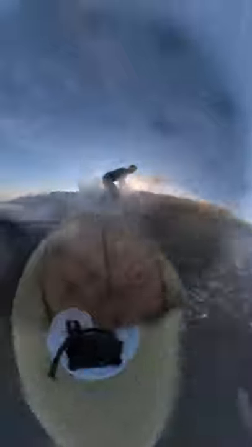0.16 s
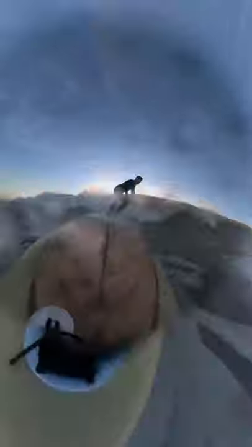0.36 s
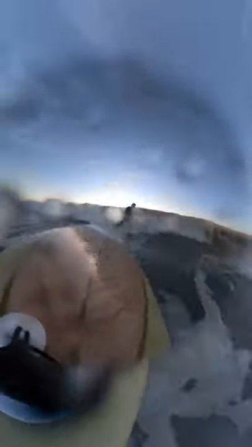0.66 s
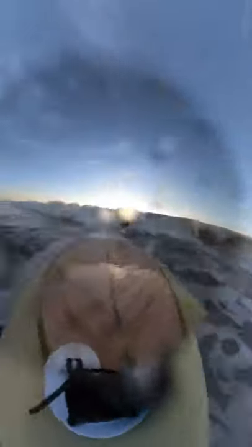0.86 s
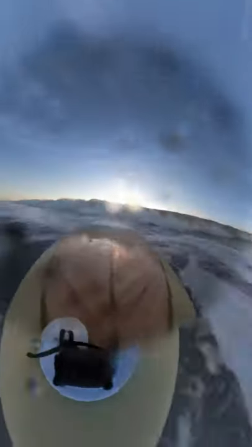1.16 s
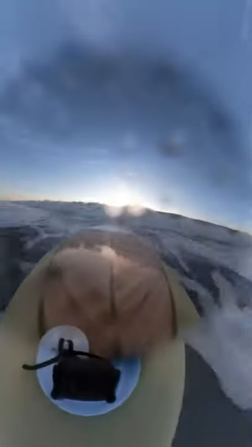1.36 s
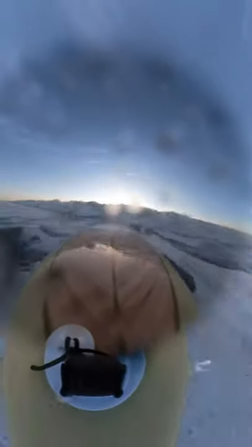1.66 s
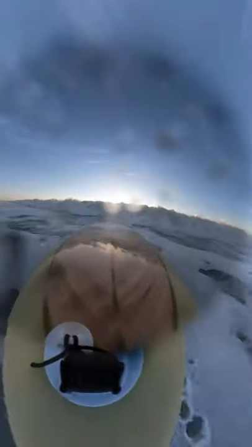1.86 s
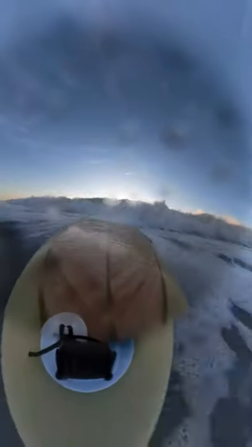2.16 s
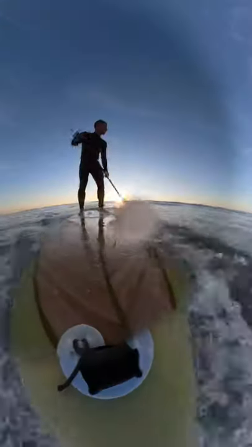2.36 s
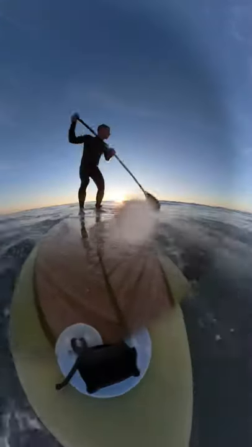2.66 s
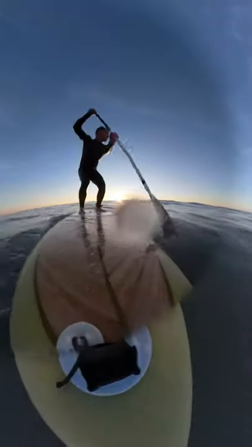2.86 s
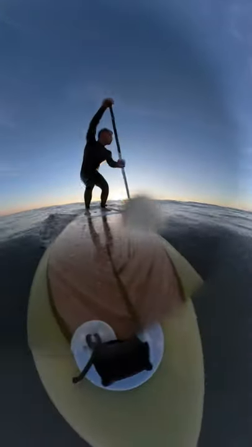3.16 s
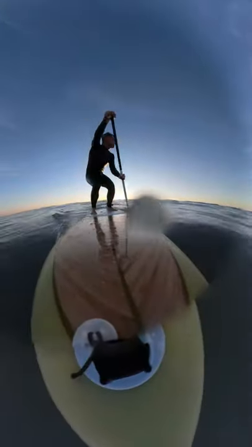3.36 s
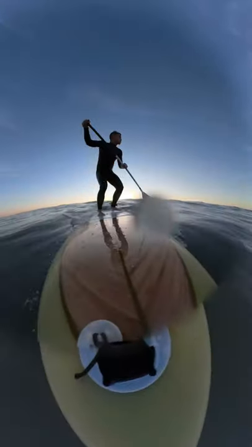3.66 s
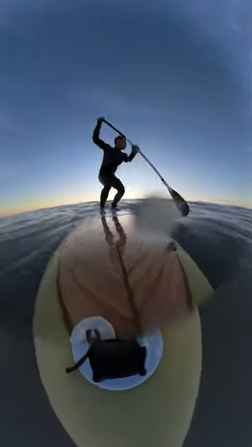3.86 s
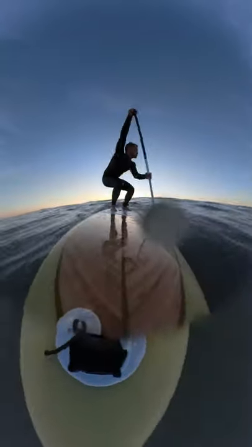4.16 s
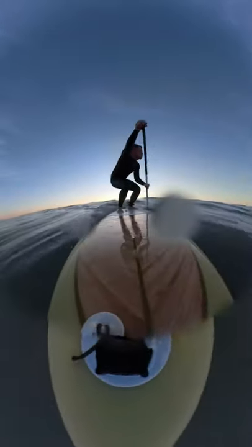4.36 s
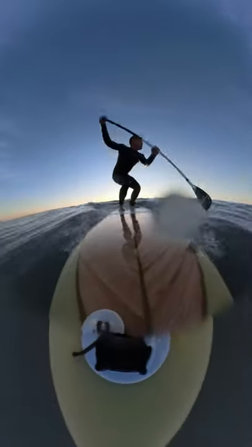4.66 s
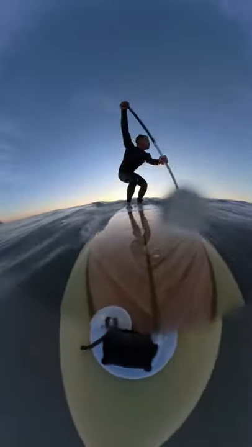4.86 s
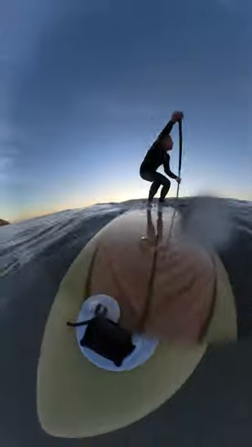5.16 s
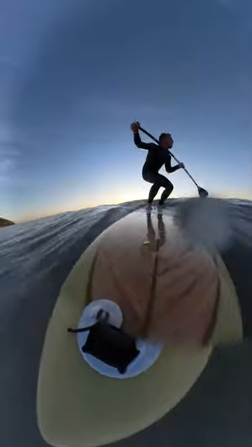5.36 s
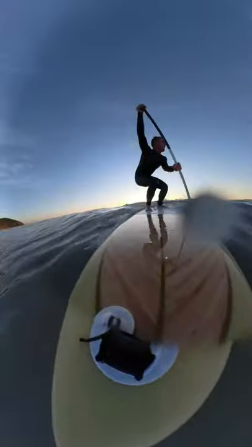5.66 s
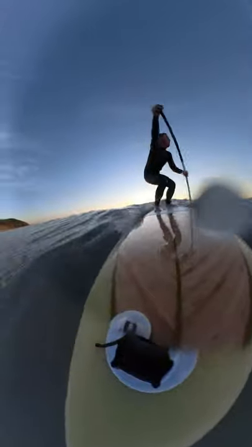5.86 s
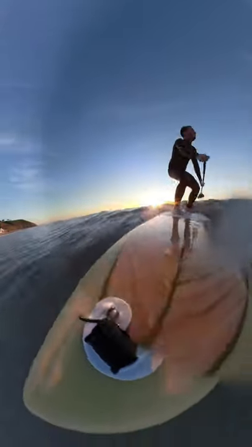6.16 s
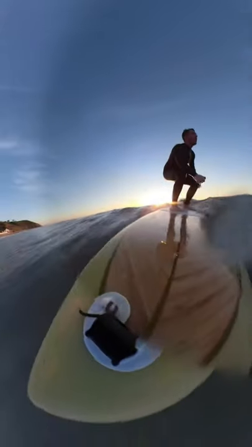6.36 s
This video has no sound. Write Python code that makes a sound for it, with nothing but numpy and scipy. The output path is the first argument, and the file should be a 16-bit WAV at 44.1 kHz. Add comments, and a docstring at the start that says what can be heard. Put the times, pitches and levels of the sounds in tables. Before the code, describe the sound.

From the start, low wind buffets a microphone on the nose of a paddle board while muffled whitewater rushes and churns. Hard gusts, soft spurts of spray, slaps and hollow thumps come unevenly, strongest around 0.9 to 1.2 seconds. At about 2.2 seconds everything cuts out for an instant, then returns with a sharp knock on the hull, a splash and a patter of fine drops that thins out by 3 seconds. The wind is now much weaker. Water washes and bubbles along the board in repeated surges, with frequent small slaps and single drops ticking close by. The hull thumps at about 3.7 and 4.4 seconds and now and then gives a brief low hum. A sharp drop strikes near 5.8 seconds among more knocks. The wind swells again, with a deep thump and splash around 6.1 seconds, and rumbles until the end at 6.5.

```python
"""Water rushing around a paddle board in the surf, heard from a microphone sealed in a housing on its nose.
The rush is the resonance of countless bubbles, surging as waves and paddle strokes shove the board.
Chop slaps and thumps the hollow hull, spray and drops strike the housing, and wind eddies buffet it.
First the board runs through whitewater, its spray softened by a film of water on the microphone;
after an instant of silence it glides along a wave with the microphone clear."""
import sys
import numpy as np
from scipy import signal
from scipy.fft import rfft, irfft, next_fast_len
from scipy.io import wavfile
from scipy.ndimage import uniform_filter1d, map_coordinates

SR = 44100
rng = np.random.default_rng(int(sys.argv[2]) if len(sys.argv) > 2 else 0)


def file_out(sig):
    """Save sig as 16-bit WAV at sys.argv[1]."""
    # one column per channel
    cols = np.atleast_2d(sig).T
    # limit, then scale
    lim = np.clip(cols, -1, 1)
    pcm = np.round(lim * 32767).astype(np.int16)
    wavfile.write(sys.argv[1], SR, pcm)


N = 286650
TIME = np.arange(N) / SR
WHITEWATER_END_S, GLIDE_START_S = 2.179, 2.225
REFERENCE_FLOW_DB = -39  # mist and stray droplets scale with the flow relative to this


def amp(db):
    """Decibels to amplitude."""
    return 10 ** (np.asarray(db) / 20)


def unit(x):
    """Normalisation to rms 1."""
    return x / np.sqrt(np.mean(x ** 2) + 1e-20)


def curves(rows):
    """Linear interpolation of each column after the time, one value per sample."""
    times, *columns = np.transpose(rows)
    return [np.interp(TIME, times, column) for column in columns]


def wobble(rate):
    """Smooth random modulation: a spline through `rate` knots a second."""
    knots = rng.standard_normal(int(N * rate / SR) + 4)
    return map_coordinates(knots, [TIME * rate])


def taper(length_s, edge):
    """A tapered cosine envelope that spends the share `edge` of its length rising and falling."""
    return signal.windows.tukey(int(length_s * SR), edge)


def filtered(x, response):
    """Linear filtering: the spectrum of x times a frequency response."""
    size = next_fast_len(len(x) + 8192)
    return irfft(rfft(x, size) * response(np.fft.rfftfreq(size, 1 / SR)), size)[:len(x)]


def coloured(x, spectrum):
    """Spectral shaping by (Hz, dB) points, at rms 1."""
    points_hz, db = np.transpose(spectrum)
    return unit(filtered(x, lambda hz: amp(np.interp(np.log(hz + 1), np.log(points_hz), db))))


def resonance(x, centre_hz, q):
    """Two damped resonators in cascade, at rms 1."""
    return unit(filtered(x, lambda hz: (1j * hz / (centre_hz**2 - hz**2 + 1j * hz * centre_hz / q))**2))


def add(track, start_s, sound):
    """Superposition of a sound on the track."""
    part = track[max(round(start_s * SR), 0):][:len(sound)]
    part += sound[:len(part)]


def wet_or_clear(wet, clear):
    """The first value while water films the microphone, the second on the glide."""
    return np.where(TIME < WHITEWATER_END_S, wet, clear)


def eddies(spectrum):
    """Turbulent pressure: eddies of fairly even strength, as noise divided by its smoothed envelope."""
    pressure = signal.hilbert(coloured(rng.standard_normal(N), spectrum))
    return unit(pressure.real / uniform_filter1d(np.abs(pressure), size=SR // 16))


# Strength of the wind. Each row: time in seconds, level in dB.
WIND_LEVELS = [(0, -25.5), (.2, -27.5), (.3, -24.5), (1.12, -20.5), (1.4, -22), (1.5, -34.5), (1.6, -29.5),
               (1.77, -27), (2.23, -30), (2.5, -35), (3.12, -45), (3.7, -34), (4.85, -36.5), (5.6, -35.5),
               (5.9, -25), (6.11, -34), (6.17, -27), (6.5, -21)]
# Spectra of fast and slow air. Each row: frequency in Hz, relative level in dB.
FAST_AIR_SPECTRUM = [(10, -21), (22, 0.5), (36, -5), (54, 5), (80, -2.5), (125, -3.5), (170, -19),
                     (300, -23.5), (800, -90), (3000, -120)]
SLOW_AIR_SPECTRUM = [(10, -20), (22, 0), (36, -1), (54, -3), (80, -5.5), (120, -12.5), (170, -34.5),
                     (300, -45), (2000, -120)]

def wind():
    """Turbulence: faster air sheds quicker eddies, so the buffeting reaches higher in the whitewater."""
    mean_db, = curves(WIND_LEVELS)
    buffet = wet_or_clear(eddies(FAST_AIR_SPECTRUM), eddies(SLOW_AIR_SPECTRUM))
    puffs_db = 1.35 * wobble(rate=12)
    return amp(mean_db + puffs_db) * buffet


# Head-on gusts. Each row: start in seconds, peak level in dB, shedding rate in Hz, length in seconds.
HEAD_GUSTS = [(0.259, -16, 47.3, 0.15), (0.387, -16, 91.4, 0.037), (0.492, -15.5, 33, .06),
              (0.582, -17, 113.3, 0.04), (0.856, -11, 43.7, 0.037), (0.976, -18, 58, 0.058),
              (1.08, -12.5, 54.3, 0.065), (1.145, -15.5, 106, 0.041), (1.231, -20.5, 91.2, 0.053),
              (1.713, -18, 46, 0.17), (2.043, -18.5, 56, 0.047), (3.692, -25.5, 60, 0.086),
              (4.565, -28, 76.7, 0.057), (5.165, -25, 58, 0.13), (5.379, -24.5, 40.3, 0.067),
              (5.551, -28, 45.6, 0.048), (6.147, -14.5, 37.2, 0.11)]

def gusts():
    """Vortex shedding: a gust leaves a short train of large, uneven vortices on the housing."""
    track = np.zeros(N)
    for start, db, hz, length in HEAD_GUSTS:
        swell = taper(length, edge=0.25)
        flutter_hz = hz * np.exp(0.2 * wobble(rate=50)[:len(swell)])
        turns = np.cumsum(flutter_hz) / SR
        add(track, start, -amp(db) * swell * np.sin(2 * np.pi * turns))
    return track


def strays(wash_db, count, typical_hz=3400, patter_s=0.02):
    """Random impacts: rows for drops() of droplets on the glide, landing harder in faster water."""
    when = rng.uniform(GLIDE_START_S, N / SR, count)
    weight, pitch = rng.standard_normal((count, 2)).T
    db = -44.5 + 10.5 * weight + wash_db[(when * SR).astype(int)] - REFERENCE_FLOW_DB
    return list(zip(when, db, typical_hz * 2 ** (0.2 * pitch), np.full(count, patter_s)))


def runoff(count, drain_s=0.55, fade_db_per_s=17, typical_hz=4200, patter_s=0.012):
    """Drainage: rows for drops() of fine droplets leaving the housing as the glide begins."""
    delay = drain_s * rng.random(count) ** 1.4
    weight, pitch = np.clip(rng.standard_normal((count, 2)), -2, 2).T
    db = -39.5 + 3.5 * weight - fade_db_per_s * delay
    return list(zip(GLIDE_START_S + delay, db, typical_hz * 2 ** (0.34 * pitch), np.full(count, patter_s)))


# Heavy drops on the housing. Each row: start in seconds, level in dB, pitch in Hz,
# time for the patter to fall 60 dB in seconds.
HEAVY_DROPS = [(.8615, -33, 5160, .012), (0.8735, -25.5, 2930, 0.02), (0.8768, -31.5, 5100, 0.016),
               (0.8882, -27, 3080, 0.016), (1.111, -38, 5400, .008), (1.119, -24, 2670, 0.016),
               (1.1269, -20.5, 3330, .024), (2.236, -29.5, 5500, .006), (2.249, -29, 3500, .014),
               (2.254, -23, 5000, 0.014), (2.269, -32, 3200, .016), (2.279, -28, 2900, .014),
               (2.291, -32, 4200, .012), (2.308, -32, 2900, .03), (2.348, -32, 3540, .025),
               (2.385, -41, 6950, 0.018), (2.415, -30.5, 4870, 0.016), (2.428, -40, 3500, .015),
               (2.476, -37, 2680, 0.03), (2.591, -37, 5000, 0.02), (2.618, -37, 3000, 0.022),
               (2.68, -34.5, 2780, .025), (2.721, -36, 5850, 0.01), (2.809, -32.5, 2600, 0.038),
               (2.976, -29, 2760, 0.019), (3.444, -32.5, 2770, .02), (3.673, -31, 2700, 0.024),
               (4.088, -29.5, 3260, 0.018), (4.594, -32.5, 2700, .014), (5.208, -25, 2540, .02),
               (5.434, -45, 5100, .015), (5.823, -34, 5600, 0.011), (5.831, -16.5, 2520, 0.018),
               (5.8341, -12, 2700, 0.003), (5.8344, -17.5, 4550, 0.0024), (6.146, -30, 5400, .015),
               (6.172, -30, 4500, 0.0065), (6.286, -32, 3370, 0.022), (6.315, -36, 4300, .02)]

def drops(droplets, rise_cycles=0.59, crisp_db=-26, lowest_hz=1960):
    """Impact sound: each heavy drop or small droplet ticks, then patters faintly as it breaks up."""
    track, t = np.zeros(N), np.arange(SR // 20) / SR
    for start, db, hz, patter_s in HEAVY_DROPS + droplets:
        age = t * hz / rise_cycles
        tick = np.sin(2 * np.pi * hz * t) * (age * np.exp(1 - age)) ** 2
        envelope = amp(-12.5 - 60 * t / patter_s) * (1 - np.exp(-age))
        patter = resonance(rng.standard_normal(len(t)), hz, q=4) * envelope
        # A drop is soft: only a small crisp share reaches far above its pitch.
        impact = filtered(0.66 * tick + patter, lambda f: 1 / (1 + (f / (1.59 * hz))**12) + amp(crisp_db))
        add(track, start, amp(db) * impact)
    # Drops are too small to radiate low frequencies.
    return filtered(track, lambda hz: 1 - 1 / (1 + (hz / lowest_hz) ** 12))


# Spray thrown over the nose. Each row: start in seconds, level in dB, length in seconds.
SPRAY_SHEETS = [(0.225, -46.5, 0.05), (0.545, -50.5, 0.018), (0.854, -44.5, 0.042), (1.102, -41.5, 0.044),
                (1.169, -48, 0.046), (1.681, -49.5, 0.03), (2.245, -44.5, 0.048), (2.962, -48.5, 0.029),
                (3.056, -50.5, 0.038), (3.117, -50, 0.077), (3.82, -54, 0.023), (4.47, -52, 0.053),
                (5.763, -58, 0.024), (6.13, -49, 0.033), (6.172, -51.5, 0.062), (6.268, -56, 0.074)]
# Spectra of a spurt at the wet microphone and of all spray at the clear one.
# Each row: frequency in Hz, relative level in dB.
WET_SPURT_SPECTRUM = [(500, -26), (1300, 4.5), (2700, 12), (4000, -10), (5500, -14), (6500, -33.5),
                      (9000, -58.5)]
CLEAR_SPRAY_SPECTRUM = [(1200, -21), (2100, 1), (2750, 3.5), (3100, -4), (3800, -6.5), (4500, -12),
                        (5200, -10), (6200, -18), (7000, -31.5), (8000, -35), (11000, -54.5)]

def spurts():
    """Incoherent summation: a sheet of spray lands all at once and its impacts merge into a hiss."""
    envelope, hiss = np.zeros(N), rng.standard_normal(N)
    for start, db, length in SPRAY_SHEETS:
        add(envelope, start, amp(db) * taper(length, edge=0.3))
    return envelope * wet_or_clear(coloured(hiss, WET_SPURT_SPECTRUM), coloured(hiss, CLEAR_SPRAY_SPECTRUM))


# Held notes of the hull. Each row: start in seconds, length in seconds, level in dB, pitch in Hz.
HULL_DRONES = [(2.86, 0.34, -47.5, 196), (3.46, 0.065, -30, 373), (4.26, 0.34, -33.5, 198),
               (5.83, 0.18, -31, 260)]

def drones():
    """Forced vibration: water drumming along the hollow hull keeps its resonance sounding unevenly."""
    track = np.zeros(N)
    for start, length, db, hz in HULL_DRONES:
        swell = taper(length, edge=0.6)
        note = resonance(rng.standard_normal(SR), hz, q=5.5)[SR // 4:][:len(swell)]
        add(track, start, amp(db) * swell * unit(note))
    return track


# Blows on the hull. Each row: start in seconds, level in dB, pitch in Hz, 60 dB decay time in seconds.
HULL_THUMPS = [(.25, -16, 304, 0.071), (0.869, -16, 257, 0.058), (1.102, -12, 322, 0.05),
               (2.06, -13.5, 135, 0.057), (2.25, -4.5, 228, 0.026), (2.281, -9.5, 234, 0.043),
               (3.688, -15, 132, 0.13), (4.369, -15, 186, 0.084), (5.665, -16.5, 221, 0.058),
               (5.848, -17, 326, 0.056), (5.915, -15, 150, 0.047), (6.139, -5, 65.5, 0.11)]

def thumps():
    """Damped free vibration: the hull answers a heavy blow of water with a low, dying note."""
    track, t = np.zeros(N), np.arange(SR // 4) / SR
    attack = 1 - np.exp(-t / 0.0044)
    for start, db, hz, t60 in HULL_THUMPS:
        add(track, start, amp(db - 60 * t / t60) * np.sin(2 * np.pi * hz * t) * attack)
    return track


# Chop striking the nose. Each row: start in seconds, level in dB, pitch of the trapped air in Hz,
# its 60 dB decay time in seconds, its relative level in dB.
CHOP_SLAPS = [(0.228, -31.5, 790, 0.067, -6), (0.396, -29.5, 780, 0.045, -3),
              (0.497, -27.5, 432, .02, -4.5), (0.55, -32.5, 1190, 0.022, -1.5),
              (0.617, -26, 400, 0.016, -3), (0.725, -24.5, 390, 0.013, -0.5),
              (0.862, -27.5, 630, 0.039, -6), (1.101, -21, 534, 0.057, -4.5), (1.113, -27, 1000, 0.023, -2),
              (1.185, -25.5, 700, 0.035, 4.5), (1.541, -34, 566, 0.022, -5), (1.55, -31, 420, 0.02, -2),
              (1.68, -32, 480, 0.06, -8), (2.088, -31.5, 1070, 0.017, 1), (2.228, -33, 1260, 0.05, -3),
              (2.246, -19, 985, 0.014, 12), (2.267, -25.5, 910, 0.036, 5), (2.292, -24, 1030, 0.016, 6),
              (2.327, -34, 886, 0.12, 1), (2.584, -31.5, 950, 0.027, 4), (2.695, -24.5, 740, 0.012, -8),
              (2.973, -25.5, 650, 0.03, -3), (3.074, -32.5, 720, 0.019, 0), (3.217, -26, 720, 0.031, -7),
              (3.336, -27, 643, 0.043, -12), (3.46, -31.5, 620, 0.1, -11), (3.587, -30.5, 735, 0.021, -8),
              (3.871, -33, 650, 0.027, -9), (4.202, -23, 690, 0.018, -5), (4.543, -29.5, 970, 0.024, -1.5),
              (4.724, -32, 700, 0.027, 4), (5.03, -27, 610, 0.015, -3), (5.263, -27, 486, 0.015, 6),
              (5.373, -25.5, 680, 0.01, 7), (5.664, -23.5, 373, 0.026, 4), (5.703, -28, 700, 0.013, -5),
              (6.136, -26.5, 1084, 0.014, 16.5)]

def slaps():
    """Air-pocket resonance: a slap smacks, splatters and rings the air it traps at a rising pitch."""
    track, t = np.zeros(N), np.arange(SR // 4) / SR
    attack = 1 - np.exp(-t / 0.0018)
    for start, db, hz, t60, ring_db in CHOP_SLAPS:
        smack = resonance(rng.standard_normal(len(t)), 1.3 * hz, q=0.8) * amp(-6.5 - 60 * t / 0.016)
        splatter = resonance(rng.standard_normal(len(t)), hz, q=1.85) * amp(-0.5 - 15 * t / t60)
        pocket = np.sin(2 * np.pi * hz * t * (1 + 3 * t)) * amp(ring_db - 60 * t / t60)
        add(track, start, amp(db) * (smack + splatter + pocket) * attack)
    # Water is a soft striker and excites little treble.
    return filtered(track, lambda hz: 1 / (1 + (hz / 3200) ** 6))


# Steady flow past the board. Each row: time in seconds, wash level in dB,
# churn relative to wash in dB (high while the hull sits deep).
STEADY_FLOW = [(0, -39, 1.5), (.16, -36, 1.5), (.38, -34.5, 2.5), (.75, -39.5, 6.5), (1.0, -36.5, 3.5),
               (1.27, -42.5, 2.5), (1.52, -44.5, 7.5), (1.9, -40, 5), (2.2, -36.5, 2.5), (2.8, -42, 5),
               (3.15, -40.5, 5), (3.9, -40.5, 7), (4.7, -40, 3), (4.87, -40, 4.5), (5.37, -42, 7),
               (5.47, -44.5, 5), (5.63, -40.5, 2.5), (5.8, -39.5, 6.5), (6.5, -42.5, 1.5)]
# Shoves from waves and paddle strokes. Each row: start in seconds, time until release in seconds,
# wash level in dB, churn relative to wash in dB, spray level in dB.
FLOW_SURGES = [(0.197, 0.022, -32, -12, -47), (0.465, 0.18, -49, 14.5, -64.5),
               (0.823, 0.044, -41, 2, -50.5), (1.053, 0.084, -37, 7.5, -50), (1.642, 0.069, -38, 6.5, -55),
               (2.037, 0.05, -36, 7, -55), (2.224, 0.059, -35.5, 0.5, -46.5), (2.473, 0.15, -40, -13, -66),
               (2.86, 0.05, -53, 13.5, -58.5), (3.17, 0.077, -38, 5, -51.5), (3.28, 0.32, -38, -0.5, -55),
               (3.815, 0.14, -48, 4, -55), (4.021, 0.09, -38, -1, -53.5), (4.231, 0.28, -38, 1, -53),
               (4.74, 0.12, -44, 8.5, -61), (4.954, 0.11, -48.5, 14.5, -55.5), (5.162, 0.12, -36.5, 7, -51),
               (5.671, 0.25, -43, 11, -57.5), (5.707, 0.11, -39.5, 4, -51.5),
               (6.344, 0.19, -52.5, 19.5, -74)]

def flow(attack_s=0.038, release_s=0.067):
    """Incoherent sources add in power: steady flow plus surges give wash, churn and spray levels in dB."""
    flow_db, deep_db = curves(STEADY_FLOW)
    mist_db = wet_or_clear(-57.5, -58.5) + 0.75 * (flow_db - REFERENCE_FLOW_DB)
    calm_db = 2 * np.exp(-((TIME - 2.5) / 0.18) ** 2)  # smooth sea behind the wave throws less spray
    power = amp([flow_db, flow_db + deep_db, mist_db - calm_db]) ** 2
    for start, length, wash_db, churn_db, spray_db in FLOW_SURGES:
        build = np.clip((TIME - start) / attack_s, 0, 1)
        drain = np.exp(-np.maximum(TIME - start - length, 0) / release_s)
        power += np.outer(amp([wash_db, wash_db + churn_db, spray_db]), build * drain) ** 2
    return 10 * np.log10(power + 1e-20)


def bubbles(low_hz, high_hz, cycles, spread_db, count, samples):
    """Bubble resonance: each of a swarm falls 60 dB in `cycles`, its pitch rising near the surface."""
    when, pitch, strength = rng.random((count, 3)).T[:, :, None]
    hz = low_hz * (high_hz / low_hz) ** pitch
    turns = hz * np.arange(samples) / SR
    life = turns / cycles
    ring = np.sin(2 * np.pi * turns * (1 + 0.066 * life)) * amp(-60 * life) * (1 - np.exp(-2 * turns))
    # Most are faint and a few stand out; small ones are brief and need more height for the same weight.
    height = amp(spread_db * np.minimum(-np.log(1 - strength), 4)) * hz ** 1.5
    index = (when * N).astype(int) + np.arange(samples)
    return unit(np.bincount(index.ravel(), (height * ring).ravel(), N + samples)[:N])


def froth(spectrum, swarm):
    """Superposition: distinct near bubbles over an equally strong blur of countless far ones."""
    return unit(coloured(swarm, spectrum) + coloured(rng.standard_normal(N), spectrum))


# Spectra of the churn, and of wash and spray at a wet or clear microphone.
# Each row: frequency in Hz, relative level in dB.
CHURN_SPECTRUM = [(50, -27), (115, -3), (180, 0.5), (260, -5.5), (380, -8), (520, -14), (900, -37.5),
                  (2000, -64), (5000, -120)]
WET_WASH_SPECTRUM = [(200, -25.5), (380, -3.5), (520, -2), (800, -2), (1100, -4.5), (1400, -10.5),
                     (1750, -17.5), (2200, -26.5), (3000, -51.5), (7000, -120)]
CLEAR_WASH_SPECTRUM = [(200, -27.5), (370, -8.5), (520, 2), (750, 0), (1000, -3), (1400, -9), (1900, -14),
                       (2200, -28.5), (3000, -64.5), (5000, -84)]
WET_SPRAY_SPECTRUM = [(1200, -12.5), (2100, -0.5), (2800, -3.5), (3300, -13.5), (3900, -21), (4600, -25),
                      (5300, -21.5), (5900, -39), (7000, -43), (9000, -73.5)]

def rushing_water(wash_db, churn_db, spray_db):
    """Smaller bubbles resonate higher: pockets churn under the hull, foam washes by, spray fizzes."""
    pockets = bubbles(101.4, 674, cycles=6.5, spread_db=1.5, count=2000, samples=1800)
    foam = bubbles(356.3, 2326, cycles=31.7, spread_db=0.7, count=4800, samples=1000)
    fizz = bubbles(1780, 9500, cycles=55, spread_db=2.4, count=9000, samples=520)
    # The wash changes tone slightly on the glide.
    wash = wet_or_clear(froth(WET_WASH_SPECTRUM, foam), froth(CLEAR_WASH_SPECTRUM, foam))
    # The water film smears the whitewater's heavier spray into a soft hiss.
    hiss = amp(2.5) * coloured(rng.standard_normal(N), WET_SPRAY_SPECTRUM)
    spray = wet_or_clear(hiss, froth(CLEAR_SPRAY_SPECTRUM, fizz))
    slosh = wobble(rate=40)
    return (amp(churn_db) * froth(CHURN_SPECTRUM, pockets)
            + amp(wash_db + 0.21 * slosh) * wash
            + amp(spray_db + wet_or_clear(0.38, 0.6) * slosh) * spray)


def scene():
    """Superposition of wind, sea and drops at the nose of the board, in mono."""
    wash_db, churn_db, spray_db = flow()
    air = wind() + gusts()
    sea = rushing_water(wash_db, churn_db, spray_db) + slaps() + thumps() + drones() + spurts()
    droplets = strays(wash_db, count=14) + runoff(count=36)
    return (air + sea + drops(droplets))[None]


def record(dry):
    """Transmission loss: the housing passes little high treble. A brief silence precedes the glide."""
    corner_hz, leak_db, top_hz = 8000, -29.5, 16000
    inside = filtered(dry[0], lambda hz: 1 / np.sqrt(1 + (hz / corner_hz) ** 24) + amp(leak_db))
    gate = np.clip((WHITEWATER_END_S - TIME) / 0.00077, 0, 1) + (TIME > GLIDE_START_S)
    return filtered(inside * gate, lambda hz: hz < top_hz)[None]


dry = scene()
out = record(dry)
file_out(out)
```